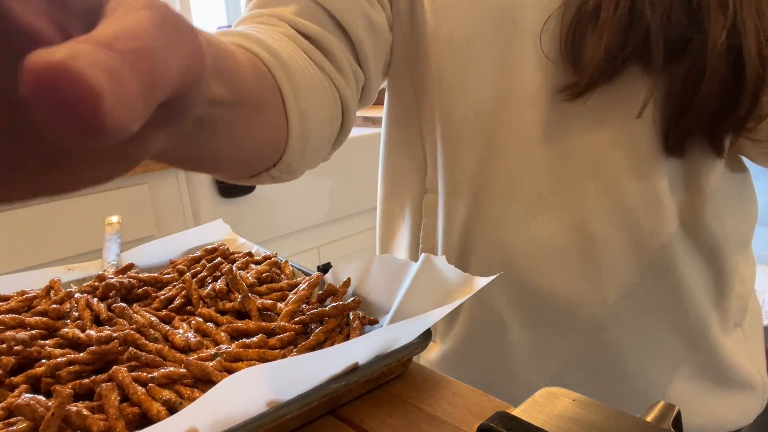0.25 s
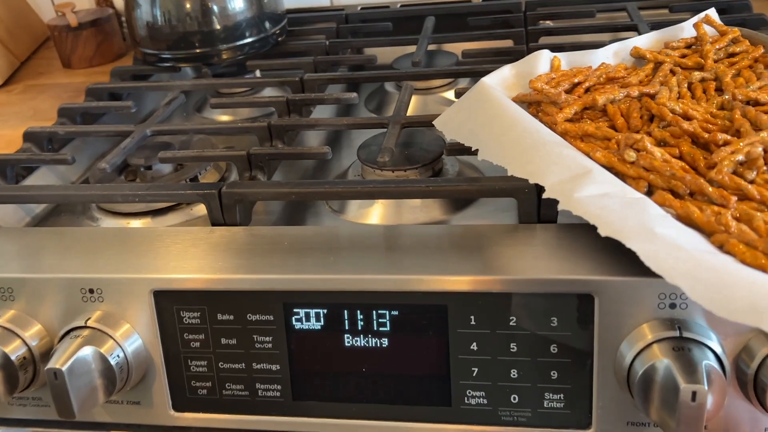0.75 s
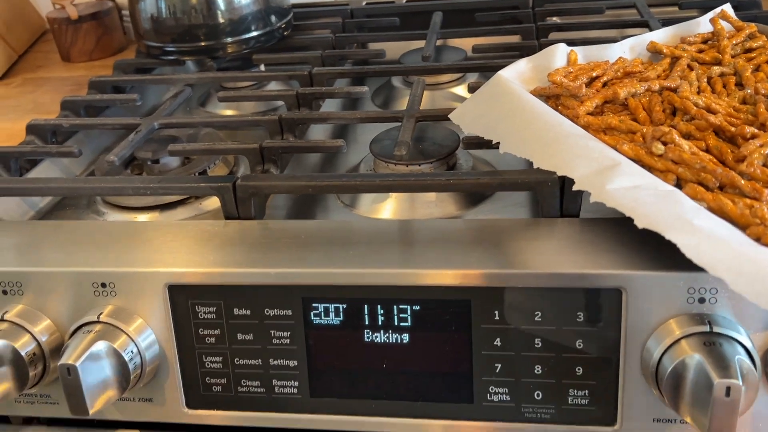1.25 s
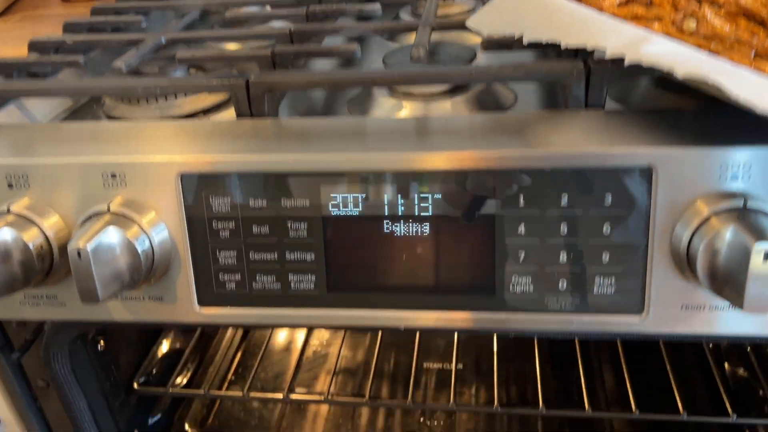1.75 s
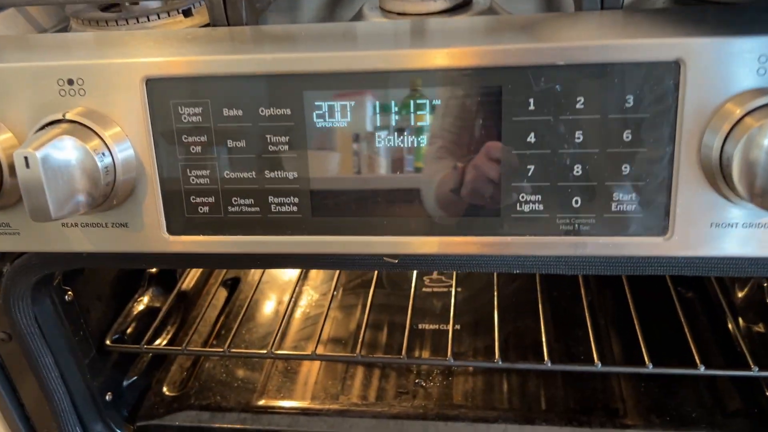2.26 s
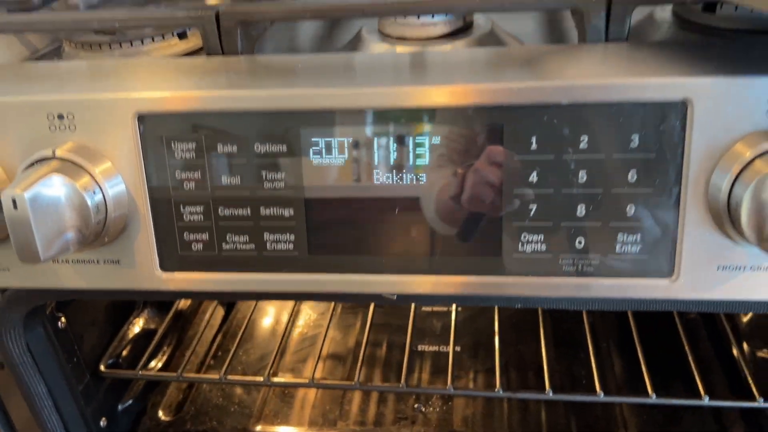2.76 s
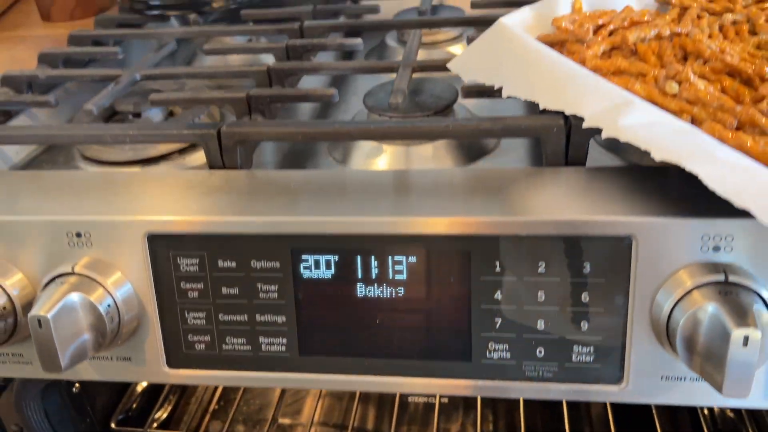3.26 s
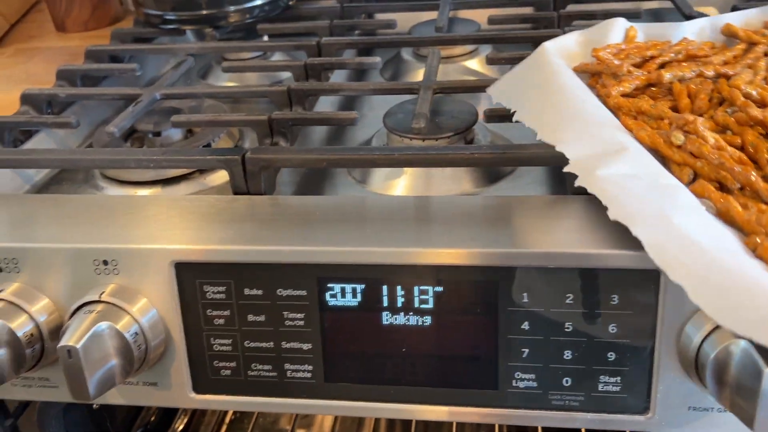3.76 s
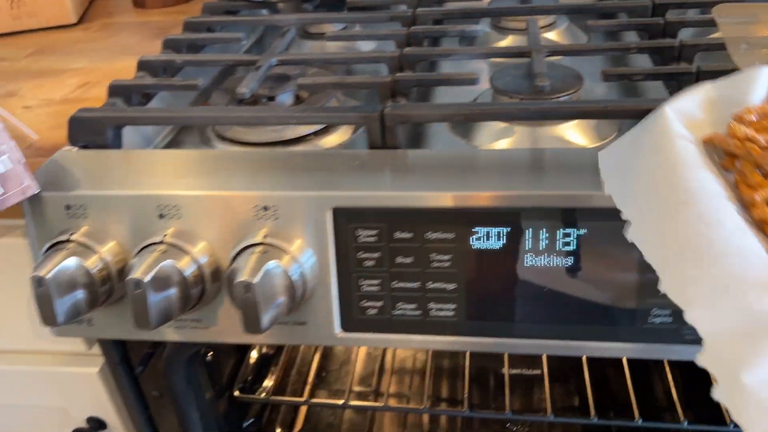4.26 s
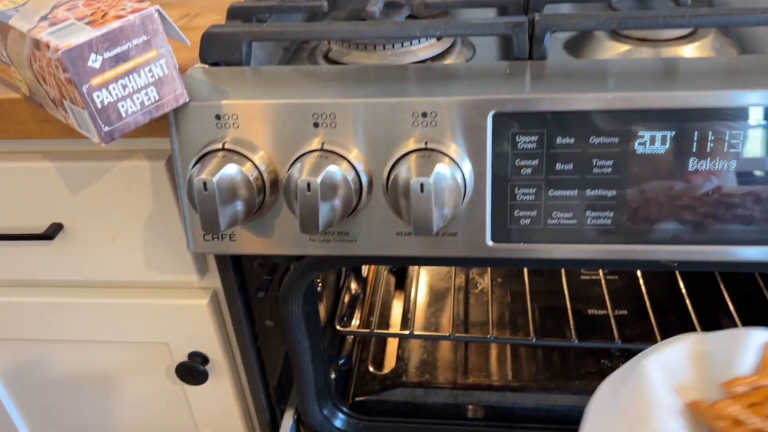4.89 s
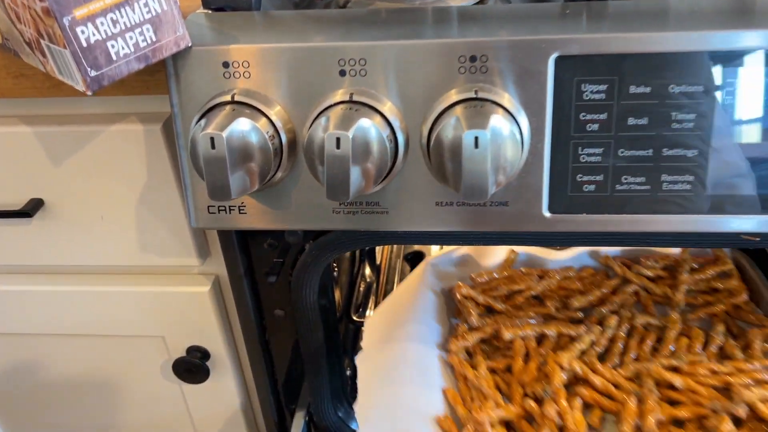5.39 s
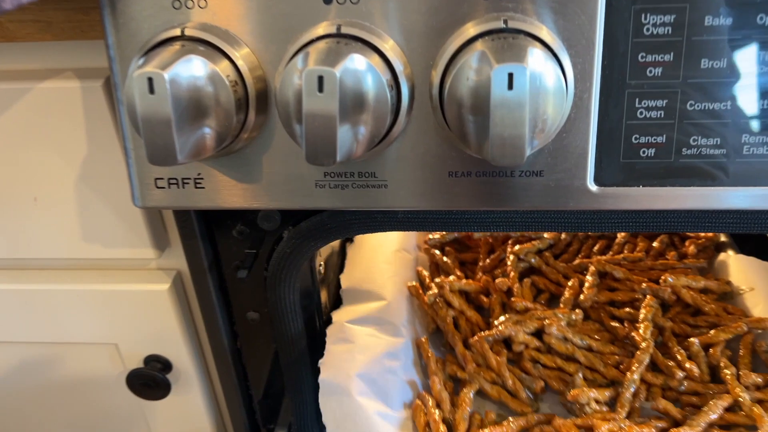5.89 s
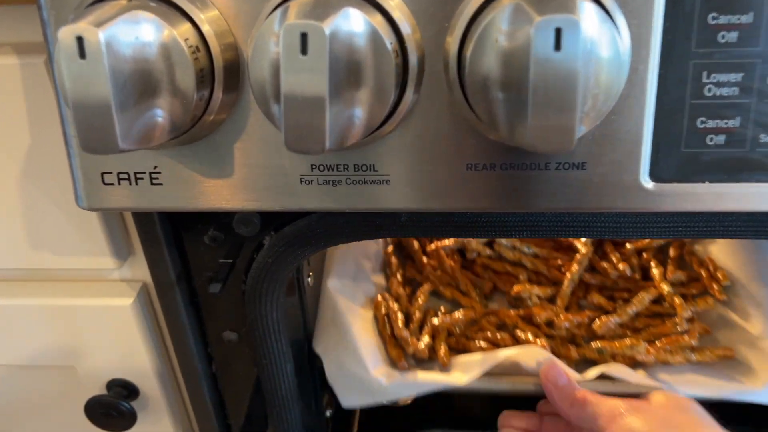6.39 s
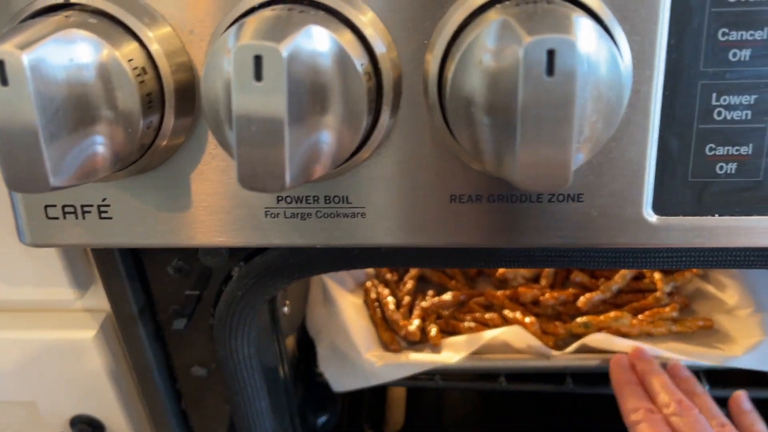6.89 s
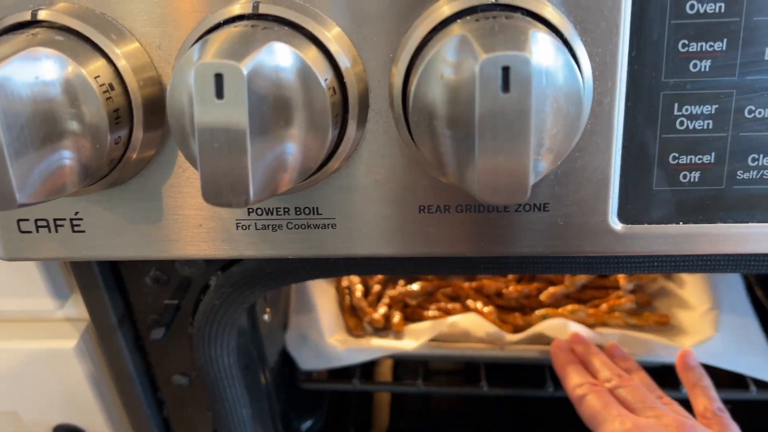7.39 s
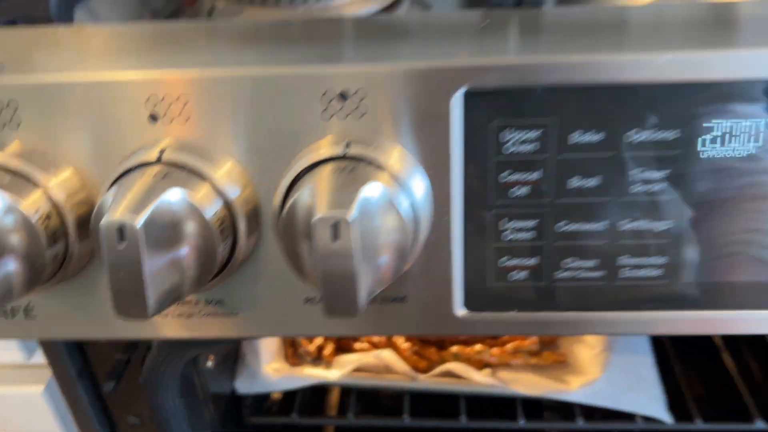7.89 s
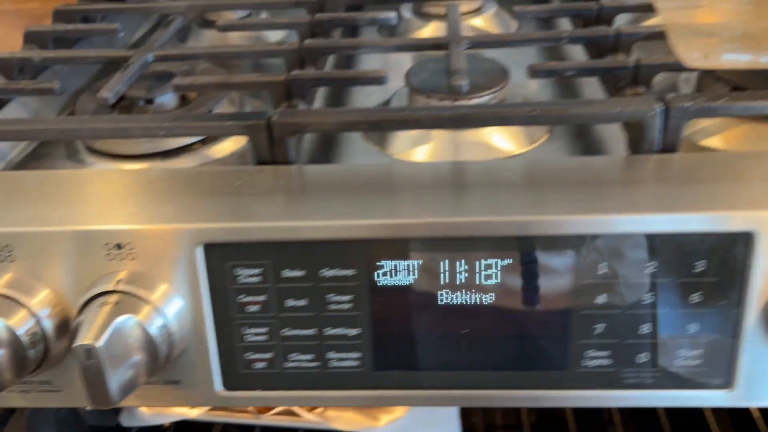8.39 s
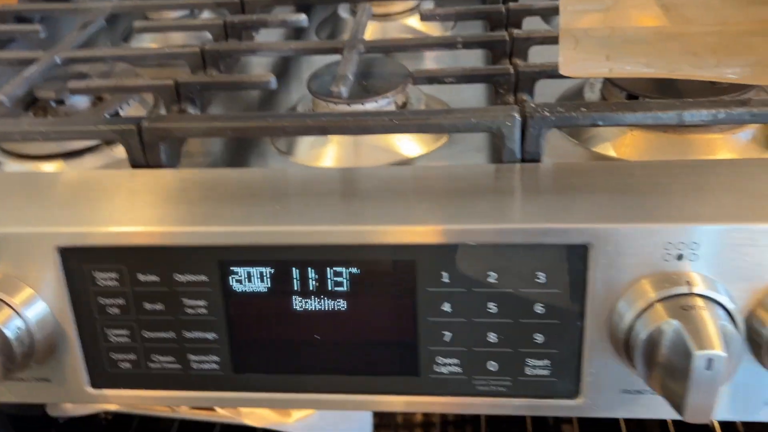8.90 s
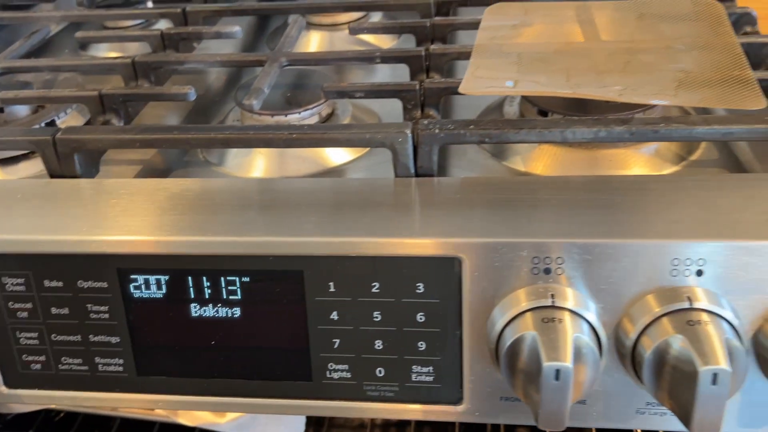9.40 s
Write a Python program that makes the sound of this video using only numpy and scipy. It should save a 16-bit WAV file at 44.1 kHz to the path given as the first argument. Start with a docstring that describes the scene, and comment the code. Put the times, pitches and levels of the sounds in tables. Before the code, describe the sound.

A low drone cuts to oven fan hum; the door ticks and thuds, then a metal tray scrapes, clangs onto a wire rack and rattles.

```python
"""Baking tray into the oven

A paper-lined tray goes into an oven in a small kitchen. The door ticks open and drops onto its stop; sheet
metal scrapes over stove grate and wire rack, clangs down and rattles; parchment rustles. Impacts are decaying
noise and modes, sliding is random slips through resonances, paper is a crackle of grains.
A drone opens the scene for half a second, then the oven fan hums; noise of the fan duct runs throughout."""
import sys
import numpy as np
from scipy import signal
from scipy.fft import rfft, irfft, next_fast_len
from scipy.io import wavfile

SR = 44100
rng = np.random.default_rng(int(sys.argv[2]) if len(sys.argv) > 2 else 0)


def dump_mix(stems):
    """Bounce the given channels to the path in sys.argv[1] as a 16-bit WAV at rate SR."""
    frames = np.atleast_2d(stems).T  # one column per channel
    limited = np.clip(frames, -1, 1)  # hard clip at full scale
    pcm = np.round(limited * 32767).astype(np.int16)
    wavfile.write(sys.argv[1], SR, pcm)


N = 425565
TIME = np.arange(N) / SR
RIGHT_LAG_S = 3e-5

# sheet-metal tray modes: f/Hz, relative level/dB, t60/s
TRAY_MODES = [(193, -5.5, 0.17), (258, -9, 0.16), (392, -5, .14), (483.6, -1.5, 0.091), (571, -3.5, .13),
              (925.5, -13, 0.085), (1157.6, 4, .085), (1771, -9.5, 0.09), (2083, -6.5, 0.07),
              (2674, -6.5, 0.083), (2821, -11.5, 0.074), (4570, -9, 0.064)]
# loaded wire rack modes: f/Hz, relative level/dB, t60/s
RACK_MODES = [(94, -17.5, .45), (138, -8.5, 0.16), (187.5, -5, 0.4), (226, -6.5, 0.37), (383, 0, 0.26),
              (440, -2.5, .25), (575, -7, .22), (689, -5.5, .25), (758, -5.5, .25), (1173, -1, .16),
              (1404, -6, 0.42), (2180, -14.5, 0.27)]
# spectrum of metal catching on metal: f/Hz, relative level/dB
CRACK_COLOUR = [(800, -12), (2500, 4.5), (4000, 6), (7000, 4.5), (9300, 4.5), (12000, -2), (16000, -19)]
# spectrum of parchment: f/Hz, relative level/dB
PAPER_COLOUR = [(300, -7.5), (1500, 3.5), (4000, -2), (7000, -6), (9000, 1), (11000, -21), (16000, -13.5)]


def clangs():
    """The loaded tray lands edge after edge: thin sheet metal clatters, tray and rack ring on."""
    # landings: t/s, clatter/dB, brightness/(dB/octave), clatter t60/s, tray modes/dB, rack modes/dB,
    # gap between edges/s, cabinet boom/dB
    landings = [(4.3428, -17, 0.5, 0.12, -15.5, -61.5, 0.0043, -37),
                (5.9075, -16, -1.1, 0.39, -27.5, -21.5, 0.011, -35.5),
                (6.03, -29, -8, 0.36, -38.5, -34.5, .008, -45),
                (6.128, -28.5, -7.5, 0.33, -42.5, -34, 0.0064, -48.5)]
    # successive edges: relative level/dB, added brightness/(dB/octave)
    edges = [(-1.5, 1), (-0.5, 0), (-8, -4)]
    # clatter spectrum: f/Hz, relative level/dB
    clatter_colour = [(20, -59), (55, -30.5), (140, -21), (220, -4), (480, -1.5), (800, -3.5),
                      (1200, -10.5), (1700, -14), (2700, -15), (6000, -23.5), (8600, -18.5), (11000, -25.5),
                      (16000, -28.5)]
    out = np.zeros((2, N))
    rise = 1 - np.exp(-TIME[:SR // 2] / 0.0015)
    for s, db, tilt_db, t60, tray_db, rack_db, gap_s, boom_db in landings:
        for k, (edge_db, edge_tilt_db) in enumerate(edges):
            tilt = tilt_db + edge_tilt_db
            clatter = dense_ring(clatter_colour, t60, damping=0.093, tilt_db=tilt, size=16384)
            add(out, s + k * gap_s, from_db(db + edge_db) * clatter)
        add(out, s, rise * from_db(tray_db) * ring(TRAY_MODES))
        add(out, s + gap_s, rise * from_db(rack_db) * ring(RACK_MODES))
        add(out, s, from_db(boom_db) * boom())
    return out


def ticks():
    """Each catch: a faint, short noise rise into a hard crack, scatter off nearby steel, rack and wire ring."""
    # catches: t/s, level/dB, brightness/(dB/octave), struck wire f/Hz, wire level re catch/dB
    catches = [(0.933, -23.5, -1, 3750, -16), (0.971, -22.5, -6.5, 3740, -13), (1.078, -32, -4, 2070, -9.5),
               (1.173, -32, 5, 4540, -7), (1.206, -22, 6.5, 8630, -13), (1.28, -37.5, -6, 8440, -8),
               (3.6627, -23.5, -1, 2930, -14.5), (3.8746, -16, -2, 2450, -15),
               (3.9287, -19, -8, 2340, -12.5), (3.959, -23.5, -6.5, 1860, -12),
               (3.9859, -23, -8, 2900, -14), (4.187, -12.5, 2, 3340, -13.5),
               (4.2002, -14.5, 7.5, 9040, -13), (4.2543, -12, 7, 7440, -15),
               (4.266, -19.5, -3, 2000, -11.5), (4.3439, -7.5, 1, 4500, -15),
               (4.4391, -13.5, 4.5, 4550, -19), (5.7998, -34.5, -7.5, 2870, -15.5),
               (5.8315, -29.5, -10, 3230, -19.5), (5.8639, -32.5, -5.5, 2330, -15),
               (5.907, -16.5, 8.5, 8640, -1.5), (5.925, -14, 5, 8490, -9.5), (6.031, -10, 3, 3960, -15),
               (6.0987, -10.5, 3, 5130, -17), (6.13, -8, 8.5, 2160, -14.5), (6.2092, -7, 6, 3430, -19.5),
               (6.235, -20, 2.5, 2850, -11.5), (6.248, -19, -7, 1460, -12.5), (6.2782, -16.5, 4, 5300, -18),
               (6.635, -21.5, 1.5, 5600, -17), (6.801, -16.5, 0.5, 1310, -16), (6.887, -30, 3, 8800, -8),
               (6.934, -23, -1.5, 1860, -15), (7.0764, -15.5, 5.5, 9020, -16),
               (7.121, -28, -8.5, 1650, -11), (7.2586, -20, -2.5, 2390, -16), (7.55, -24, -6.5, 1120, -17),
               (7.5621, -13, 5, 8900, -18), (8.2753, -34.5, 6, 6650, -21)]
    # rack ring spectrum: f/Hz, relative level/dB
    rack_colour = [(150, -8.5), (450, -11), (900, -1), (1500, -1.5), (1950, 0), (2700, -4), (3200, -2),
                   (3700, -14.5), (4200, -12), (4700, -4), (5500, -23), (16000, -43.5)]
    rise_in_db, crack_db, scatter_db, rack_db = -31.5, -8.5, -13, -18.5   # re catch level
    rise_in_t60_s, note_t60_s, note_spread = 0.098, 0.04, 0.038
    out, t = np.zeros((2, N)), TIME[:8192]
    rise = 1 - np.exp(-t / 0.0006)
    for s, db, tilt_db, note_hz, note_db in catches:
        # reversed decay: swells up to the crack
        rise_in = dense_ring(CRACK_COLOUR, rise_in_t60_s, damping=0, tilt_db=tilt_db, size=2048)[:, ::-1]
        crack = direct(dense_ring(CRACK_COLOUR, t60=0.0034, damping=0.056, tilt_db=tilt_db, size=2048)[0])
        scatter = dense_ring(CRACK_COLOUR, t60=0.054, damping=0.044, tilt_db=tilt_db, size=len(t))
        rack = dense_ring(rack_colour, t60=0.09, damping=0.12, size=len(t))
        note = from_db(-60 * t / note_t60_s) * cluster(note_hz, note_spread, t)
        tail = from_db(db + scatter_db) * scatter
        tail = tail + from_db(db + rack_db) * rack
        tail = tail + from_db(db + note_db) * note
        add(out, s - rise_in.shape[1] / SR, from_db(db + rise_in_db) * rise_in)
        add(out, s, from_db(db + crack_db) * crack)
        add(out, s, rise * tail)
    return out


def slides():
    """Fine slips hiss; coarser slips and snags ring wires, tray and rack; paper crinkles, cabinet rumbles."""
    # spectra: f/Hz, relative level/dB
    hiss_colour = [(150, -20), (600, 2), (1600, -4), (2500, -8), (4000, -3.5), (6500, 0), (9000, 3.5),
                   (10500, -4), (13000, -2), (16000, -11)]
    rub_colour = [(300, -18.5), (800, -4.5), (1500, -1), (2600, 2), (4200, -2.5), (6000, -12), (16000, -36)]
    judder_colour = [(20, -35), (100, -20), (190, -11.5), (240, -11), (330, 10), (520, -10), (640, -1.5),
                     (900, -4), (1400, -11), (2600, -7), (6000, -34.5), (16000, -56.5)]
    rumble_colour = [(30, -32.5), (55, 1), (70, -11), (92, 8.5), (110, -16), (200, -10), (300, -27),
                     (1000, -58)]
    # rubbed single wires: f/Hz, relative level/dB, t60/s
    wire_modes = [(1425, 2, 0.084), (1960, 0.5, 0.11), (2450, 1.5, 0.084), (3240, -3.5, 0.13),
                  (4700, -4, .12), (5200, -4, .09), (8415, 3, 0.046)]
    on_rack_s = 5.0   # before this the tray rests on the stove grate
    hiss, judder, rumble = pushing()
    contact = from_db(3.5) * hiss * grit(hiss_colour, per_s=3700, spread_db=0.0) * from_db(3.0 * drift(63))
    wires = from_db(-1.4) * travelling(hiss * grains(per_s=130, spread_db=1.0), rub_colour, t60=0.12)
    singing = from_db(-6.0) * excite(hiss * grains(per_s=120, spread_db=1.0), ring(wire_modes))
    snags = from_db(-9) * travelling(hiss * grains(per_s=39, spread_db=-2.0), CRACK_COLOUR, t60=0.037)
    snap = dense_ring(PAPER_COLOUR, t60=0.012, damping=0, size=2048)
    crinkles = from_db(-5.5) * excite(hiss * grains(per_s=55, spread_db=1.5), snap)
    coarse = judder * grains(per_s=530, spread_db=-0.5)
    sheet = from_db(-9.0) * travelling(coarse, judder_colour, t60=0.13)
    tray = from_db(-20) * excite(coarse, ring(TRAY_MODES))
    rack = from_db(-7.5) * excite(coarse * (TIME > on_rack_s), ring(RACK_MODES))
    cabinet = rumble * noise(rumble_colour, N)
    return contact + wires + singing + snags + crinkles + sheet + tray + rack + cabinet


def pushing():
    """Judder ramps as weight shifts during a push, then holds; hiss and rumble follow it in part."""
    # pushes: start/s, end/s, hiss/dB, judder at start/dB, judder at end/dB, cabinet rumble/dB
    pushes = [(3.422, 4.178, -49, -57, -30, -58.5), (5.978, 6.509, -40.5, -27, -48, -42.5),
              (7.077, 7.488, -51.5, -47, -49, -51)]
    hiss_release_s, judder_release_s = 0.044, 0.005
    judder_settles = 0.83   # share of the push after which judder holds
    hiss_follows, rumble_follows = 0.085, 0.26   # shares of the judder's dB swing
    waver_db, waver_per_s = -0.34, 67   # uneven hand pressure
    hiss = judder = rumble = 0
    for start, end, hiss_db, first_db, last_db, rumble_db in pushes:
        settled = start + judder_settles * (end - start)
        judder_db = np.interp(TIME, [start, settled], [first_db, last_db])
        swing_db = judder_db - (first_db + last_db) / 2
        sliding = stroke(start, end, hiss_release_s)
        hiss = hiss + sliding * from_db(hiss_db + hiss_follows * swing_db)
        rumble = rumble + sliding * from_db(rumble_db + rumble_follows * swing_db)
        judder = judder + stroke(start, end, judder_release_s) * from_db(judder_db)
    return np.array([hiss, judder, rumble]) * from_db(waver_db * drift(waver_per_s))


def stroke(start, end, release_s):
    """Linear attack, hold and exponential release of one push."""
    attack_s = 0.078
    release = np.exp(-np.clip((TIME - end) / release_s, 0, 20))
    return np.clip((TIME - start) / attack_s, 0, 1) * release


def scrapes():
    """Dragged along a wire, the rim excites a rough resonance and its octave, gliding with the contact."""
    # drags: t/s, length/s, first pitch/Hz, last pitch/Hz, level/dB
    drags = [(3.82, .2, 415.5, 429.3, -43.5), (3.998, 0.077, 404.5, 384.6, -39),
             (3.996, 0.19, 830, 769, -44), (4.095, 0.095, 400, 383.5, -38.5), (5.927, 0.074, 370, 457, -27),
             (5.949, 0.12, 1300, 1480, -36.5), (6.11, 0.079, 570, 533, -37.5),
             (6.112, .078, 2340, 2720, -38), (6.237, 0.067, 2080, 1920, -46),
             (6.382, 0.086, 2150, 2450, -51)]
    width_hz, octave_db = 100, -13
    lowpass = signal.butter(2, width_hz / 2, fs=SR)
    out = np.zeros((2, N))
    for s, length, first_hz, last_hz, db in drags:
        size = round(length * SR)
        phase = 2 * np.pi * np.cumsum(np.linspace(first_hz, last_hz, size)) / SR
        rough = signal.lfilter(*lowpass, rng.standard_normal((4, size + 2048)))[:, 2048:]   # skip run-in
        note = rough[0] * np.sin(phase) + rough[1] * np.cos(phase)
        octave = rough[2] * np.sin(2 * phase) + rough[3] * np.cos(2 * phase)
        tone = rms_one(note + from_db(octave_db) * octave)
        add(out, s, direct(from_db(db) * np.sqrt(np.hanning(size)) * tone))
    return out


def squeaks():
    """Rubbed metal briefly sings in one rough resonance."""
    # rubs: t/s, length/s, pitch f/Hz, level/dB
    rubs = [(5.791, 0.03, 704, -52), (6.879, 0.024, 2280, -47.5), (7.028, 0.05, 1700, -47.5),
            (7.526, 0.052, 2030, -43.5)]
    return sum(from_db(db) * swell(s, length) * resonant_noise(hz, width_hz=0.29 * hz)
               for s, length, hz, db in rubs)


def knocks():
    """Padded blows, duller the softer the contact: hollow panel, ringing steel, booming cabinet."""
    # blows of the oven door and things around it: t/s, level/dB, t60/s, contact cut-off f/Hz,
    # cabinet boom/dB, left-right/dB, panel notes re knock/dB, steel ring/dB
    blows = [(1.044, -46, 0.33, 700, -48.5, -2, 2, -60), (1.207, -38.5, 0.2, 3080, -53, 1.5, 5.5, -49),
             (1.56, -38, 0.1, 3560, -51.5, 1, -2, -60), (2.2926, -24.5, 0.12, 2900, -32.5, 0.5, 5, -41),
             (2.322, -39, 0.11, 5000, -40, 5, -2, -41.5), (2.348, -32, 0.1, 2400, -44, 1, -14, -37),
             (7.267, -17.5, 0.051, 453, -42.5, -4.5, -29, -64),
             (9.2173, -31, 0.11, 2850, -53.5, -3.5, 9, -40), (9.2618, -41, 0.1, 2180, -63, -5, 11.5, -48.5)]
    # knock spectrum: f/Hz, relative level/dB
    knock_colour = [(20, -23), (60, 3), (200, -0.5), (400, 2), (650, 1), (1000, -1.5), (1600, -4),
                    (3000, -13.5), (6000, -19.5), (16000, -21.5)]
    # hollow door panel notes: f/Hz, relative level/dB, t60/s
    panel_modes = [(667, 9, 0.0094), (1100, -24, 0.017), (1470, 7, 0.0056)]
    # door steel modes: f/Hz, relative level/dB, t60/s
    door_modes = [(466, 1.5, 0.15), (1043, -1, 0.11), (1318, -14, 0.37), (1550, -8.5, 0.16),
                  (2076, -5, 0.093), (2740, -18.5, 0.19), (3330, -21, .19)]
    out, t = np.zeros((2, N)), TIME[:SR // 2]
    notes = sum(from_db(db - 60 * t / t60) * np.sin(2 * np.pi * hz * t) for hz, db, t60 in panel_modes)
    panel = (t / 0.0019) * notes
    for s, db, t60, contact_hz, boom_db, pan_db, panel_db, steel_db in blows:
        body = from_db(panel_db) * panel + dispersed(dense_ring(knock_colour, t60, damping=0.044, size=len(t)))
        knock = signal.lfilter(*signal.butter(2, min(contact_hz, SR / 3), fs=SR), body)
        steel = (1 - np.exp(-t / 0.0043)) * ring(door_modes)
        pan = from_db(pan_db * np.array([[0.5], [-0.5]]))
        add(out, s, pan * (from_db(db) * knock + from_db(steel_db) * steel))
        add(out, s, from_db(boom_db) * boom())
    return out


def dispersed(x):
    """Through a thin panel the highs arrive first; low bending waves travel more slowly and trail."""
    lag_s, lag_below_hz = 0.01497, 382.3
    hz = np.arange(x.shape[1] // 2 + 1) * SR / x.shape[1]
    turn = 2 * np.pi * lag_s * lag_below_hz * np.arctan(hz / lag_below_hz)
    return irfft(rfft(x) * np.exp(-1j * turn), x.shape[1])


def boom():
    """The oven cabinet answers a blow with a low boom that builds more slowly."""
    # boom spectrum: f/Hz, relative level/dB
    boom_colour = [(25, -26.5), (50, -9), (85, -5), (140, -11), (220, -11.5), (400, -23), (1000, -56)]
    return (1 - np.exp(-TIME[:SR] / 0.012)) * dense_ring(boom_colour, t60=0.16, damping=0.73)


def parchment():
    """Stiff paper crackles in clumps as it bends and settles after each swell."""
    # shifts: t/s, length/s, level/dB
    shifts = [(1.028, 0.33, -57.5), (1.38, 0.17, -62), (2.026, 0.24, -70.5), (2.279, 0.048, -45.5),
              (2.329, 0.035, -46.5), (2.366, 0.043, -49.5), (2.386, 0.1, -71), (3.23, 0.15, -60),
              (3.47, 0.2, -48.5), (4.062, 0.089, -35.5), (4.164, 0.1, -38), (4.259, 0.15, -43.5),
              (4.367, 0.097, -39), (4.924, 0.51, -71), (5.81, 0.23, -55.5), (6.65, 0.85, -58),
              (7.49, 0.1, -60), (8.255, 0.15, -67), (9.112, 0.15, -62.5)]
    release_s, clump_db, clumps_per_s = 0.0088, 3.5, 170
    bend = sum(from_db(db) * swell(s, length) ** 2 for s, length, db in shifts)
    keep = np.exp(-1 / (release_s * SR))
    bend = signal.lfilter([1 - keep], [1, -keep], bend + 1e-18)
    clumps = from_db(clump_db * drift(clumps_per_s))
    return bend * clumps * grit(PAPER_COLOUR, per_s=3000, spread_db=3.5)


def background():
    """A drone, stronger on the left, stops short and the fan's hum and air take over; duct noise throughout."""
    # spectra: f/Hz, relative level/dB
    drone_colour = [(20, -62), (50, -1), (120, -6), (200, 2.5), (300, -5.5), (450, 2), (550, -13.5),
                    (1000, -20), (1400, -29.5), (2800, -32), (3200, -41.5), (7500, -45), (9000, -47.5),
                    (16000, -49)]
    fan_colour = [(20, -33.5), (40, -19), (56, 2.5), (75, -13.5), (140, -8.5), (230, -16.5), (450, -19),
                  (540, -27.5), (1000, -36.5), (1400, -38.5), (2800, -48), (3400, -53.5), (8500, -53.5),
                  (16000, -70)]
    # steady tones: f/Hz, level/dB (rms; the drone's before panning)
    drone_tones = [(118.4, -48), (360.7, -50.5), (382.2, -58), (463.0, -45.5)]
    fan_tones = [(57.5, -54), (120, -74.5), (242, -68), (361, -69), (409, -70), (474, -72)]
    # fan duct resonances: f/Hz, width of one filter pass/Hz, rms level/dB
    duct_modes = [(720, 200, -76.5), (1710, 370, -83.5), (2770, 420, -89)]
    drone_end_s, fade_s = 0.503, 0.0017
    drone = from_db(-44.5) * noise(drone_colour, N) + hum(drone_tones, waver=0.66, rate=11.2)
    fan = from_db(-53) * noise(fan_colour, N) + hum(fan_tones, waver=0.47, rate=3.3)
    duct = sum(from_db(db) * resonant_noise(hz, width_hz) for hz, width_hz, db in duct_modes)
    droning = np.clip((drone_end_s - TIME) / fade_s, 0, 1)
    return droning * drone * from_db([[1.8], [-2.4]]) + (1 - droning) * fan + duct


def hum(tones, waver, rate):
    """Motor tones whose phase wanders (waver in rad, rate in knots/s)."""
    return sum(from_db(db) * np.sqrt(2) * np.sin(2 * np.pi * hz * TIME + waver * drift(rate))
               for hz, db in tones)


def kitchen(x):
    """Diffuse tail of a small hard room."""
    # f/Hz, relative level/dB
    walls = [(60, 7.0), (300, 0.5), (1500, -0.5), (5000, 1.0), (9000, -4.5), (11000, -20.5), (16000, -12.0)]
    tail = dense_ring(walls, t60=0.71, damping=0.08) * (1 - np.exp(-TIME[:SR] / 0.0028))
    return excite(x.mean(axis=0), tail)


def from_db(db):
    """Decibels to amplitude."""
    return 10 ** (np.asarray(db) / 20)


def rms_one(x):
    """Scale to rms 1."""
    return x / np.sqrt(np.mean(x ** 2) + 1e-20)


def at_hz(points, hz):
    """Read a table on a log-frequency axis."""
    table = np.array(points)
    return np.interp(np.log(hz), np.log(table[:, 0]), table[:, 1])


def add(out, s, sound):
    """Mix a sound in at s seconds."""
    start = round(s * SR)
    out[:, start:start + sound.shape[1]] += sound[:, :N - start]


def drift(rate):
    """Slow random curve through unit-variance knots, rate knots per second."""
    knots = rng.standard_normal(int(rate * N / SR) + 2)
    return np.interp(TIME * rate, np.arange(len(knots)), knots)


def swell(s, length):
    """A rounded rise and fall."""
    return np.sqrt(np.maximum(1 - (2 * (TIME - s) / length - 1) ** 2, 0))


def coloured(mid, side, colour, tilt_db=0):
    """Two unrelated signals become a coloured stereo pair, most alike in the bass, slightly from the left."""
    # left-right likeness: f/Hz, likeness/1
    likeness = [(60, 1), (150, 0.91), (350, 0.45), (700, 0.25), (1500, 0.16), (3000, 0.12), (8000, 0.5),
                (14000, 0.4)]
    padded = next_fast_len(len(mid))
    hz = np.maximum(np.arange(padded // 2 + 1) * SR / padded, 1)
    alike = np.clip(at_hz(likeness, hz), 0, 1)
    shared = np.sqrt(1 + alike) * rfft(mid, padded)
    opposed = np.sqrt(1 - alike) * rfft(side, padded) * [[1], [-1]]
    both = shared + opposed
    both[1] *= np.exp(-2j * np.pi * hz * RIGHT_LAG_S)
    gain = from_db(at_hz(colour, hz) + tilt_db * np.log2(hz + 200))   # tilt flattens below 200 Hz
    return rms_one(irfft(both * gain, padded)[:, :len(mid)])


def noise(colour, size, tilt_db=0):
    """Coloured stereo noise of rms 1."""
    return coloured(*rng.standard_normal((2, size)), colour, tilt_db)


def grains(per_s, spread_db):
    """Tiny slips at random moments, uneven in size; rms 1."""
    sizes = from_db(spread_db * np.minimum(rng.exponential(1, N), 4)) * rng.choice([-1, 1], N)
    return rms_one(sizes * (rng.random(N) < per_s / SR))


def grit(colour, per_s, spread_db):
    """Dry stereo crackle of tiny contacts; rms 1."""
    return coloured(grains(per_s, spread_db), grains(per_s, spread_db), colour)


def resonant_noise(hz, width_hz):
    """Stereo noise through one resonance, applied twice for steep skirts; rms 1."""
    b, a = signal.iirpeak(hz, hz / width_hz, fs=SR)
    hiss = rng.standard_normal(N) + 0.26 * rng.standard_normal((2, N))
    return rms_one(signal.lfilter(b, a, signal.lfilter(b, a, hiss)))


def dense_ring(colour, t60, damping, tilt_db=0, size=SR):
    """Countless close modes: t60/s holds at 1 kHz, decay rate grows by 2**damping per octave."""
    spectrum = rfft(noise(colour, size, tilt_db))
    octave = np.log2(np.clip(np.arange(spectrum.shape[1]) * SR / size, 62.5, 16000) / 1000)
    out = 0
    for k in range(-4, 5):   # overlapping octave bands
        band = irfft(spectrum * np.maximum(1 - abs(octave - k), 0), size)
        out = out + band * 1000 ** (-TIME[:size] * 2 ** (k * damping) / max(t60, 0.002))
    return out


def cluster(hz, spread, t, side_turn=0.17, count=4):
    """A few close modes beat against each other, together as strong as one sine."""
    pitches = hz * (1 + spread * ((np.arange(count) + rng.random(count)) * 2 / count - 1))
    phases = rng.uniform(0, 2 * np.pi, count) + side_turn * rng.standard_normal((2, count))
    angles = 2 * np.pi * np.outer(pitches, t)
    return (np.cos(phases) @ np.sin(angles) + np.sin(phases) @ np.cos(angles)) / np.sqrt(count)


def ring(modes, uneven_db=2.5):
    """Clustered modes of a metal body; every contact point gives them other strengths."""
    mode_spread = 0.026   # share of the centre pitch, either side
    t, out = TIME[:SR // 2], 0
    for hz, db, t60 in modes:
        level_db = db + uneven_db * rng.standard_normal() - 60 * t / t60
        out = out + from_db(level_db) * cluster(hz, mode_spread, t, count=3)
    return out


def excite(force, response):
    """Play a force through a response of unit energy (mean of both sides)."""
    unit = rms_one(response) / np.sqrt(response.shape[1])
    return signal.oaconvolve(np.atleast_2d(force), unit, axes=1)[:, :N]


def travelling(force, colour, t60, count=6):
    """The contact moves along the metal: force fades from one set of fine resonances into the next."""
    place = np.cumsum(np.abs(22 + 6 * drift(5))) / SR   # speed in sets per second
    out = 0
    for k in range(count):
        near = np.sqrt(np.maximum(1 - abs((place - k) % count - 1), 0))
        out = out + excite(force * near, dense_ring(colour, t60, damping=0.068, size=8192))
    return out


def direct(x):
    """Straight-line sound in both channels, the right one slightly later."""
    hz = np.arange(len(x) // 2 + 1) * SR / len(x)
    lag_s = np.array([[0], [RIGHT_LAG_S]])
    return irfft(rfft(x) * np.exp(-2j * np.pi * hz * lag_s), len(x))


def scene():
    """Tray, paper and door with their room tail, over the background."""
    near = clangs() + ticks() + slides() + scrapes() + squeaks() + parchment()
    dull = knocks()
    room = kitchen(from_db(-14.5) * near + from_db(-12.5) * dull)
    return (near + dull + room) * from_db([[-0.2], [0.2]]) + background()


def record(dry):
    """Cut the top steeply."""
    cutoff_hz = 16400
    return signal.sosfiltfilt(signal.ellip(8, 0.1, 50, cutoff_hz, fs=SR, output="sos"), dry)


dry = scene()
out = record(dry)
dump_mix(out)
```